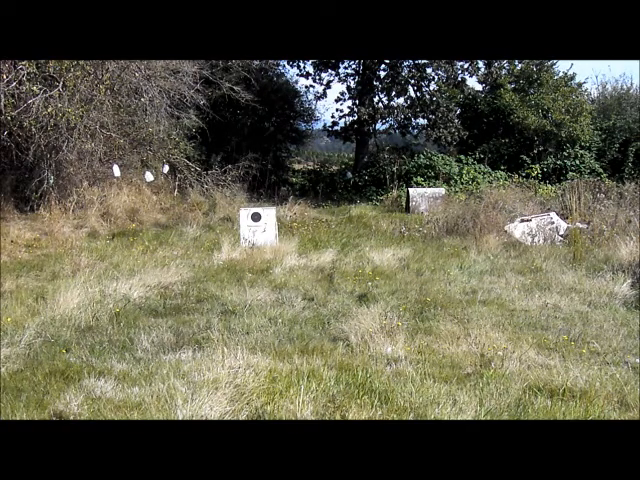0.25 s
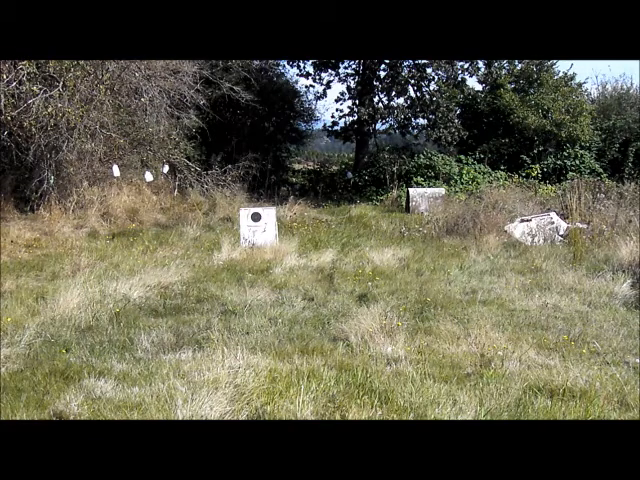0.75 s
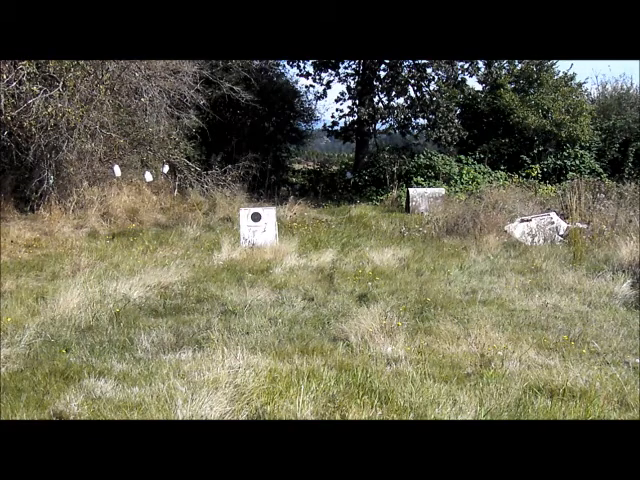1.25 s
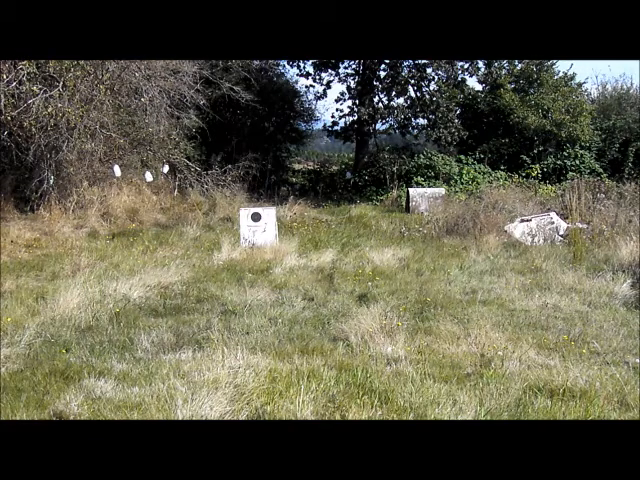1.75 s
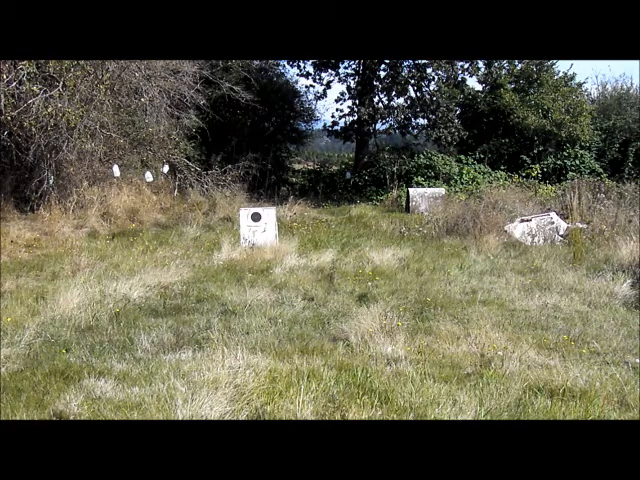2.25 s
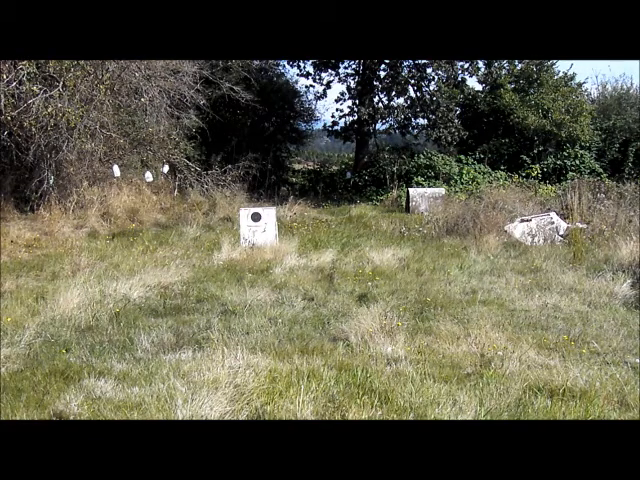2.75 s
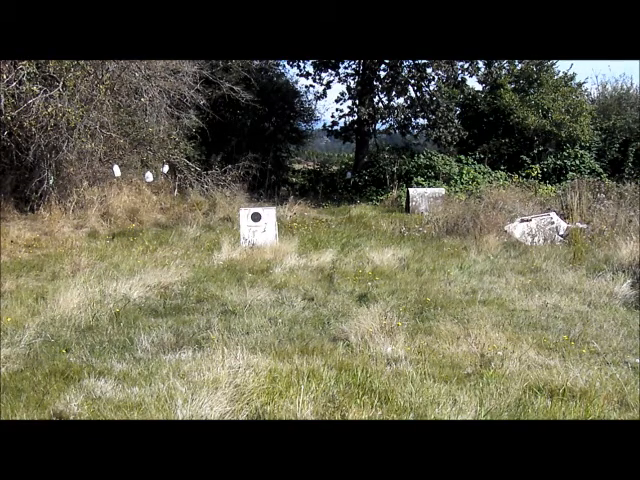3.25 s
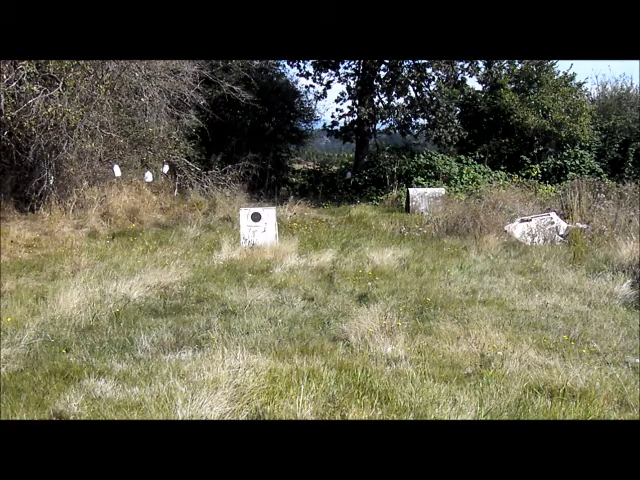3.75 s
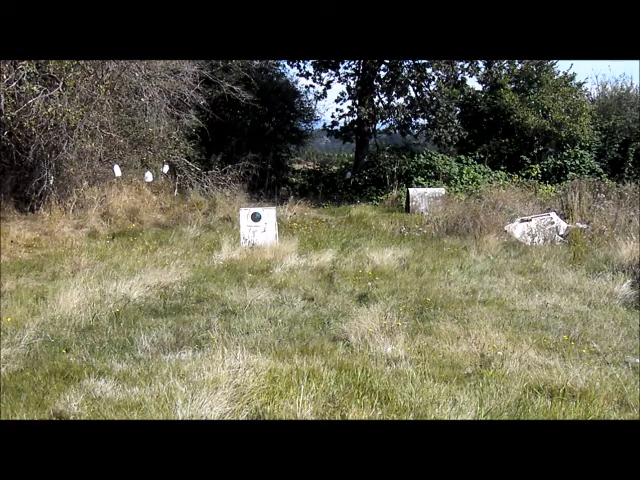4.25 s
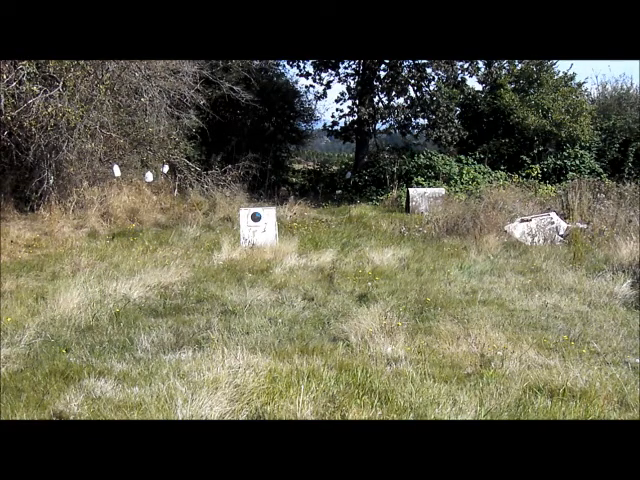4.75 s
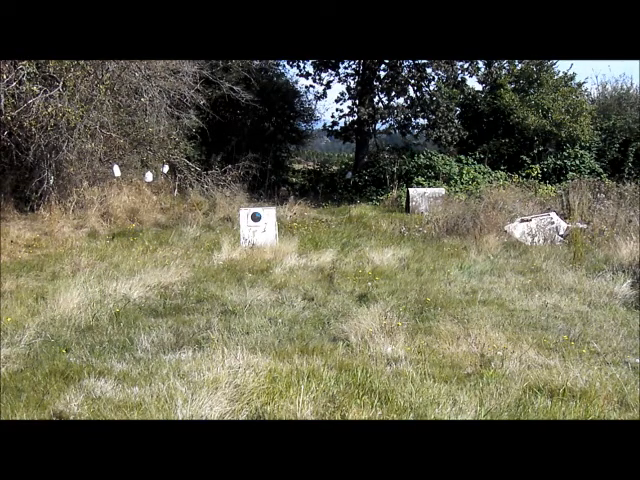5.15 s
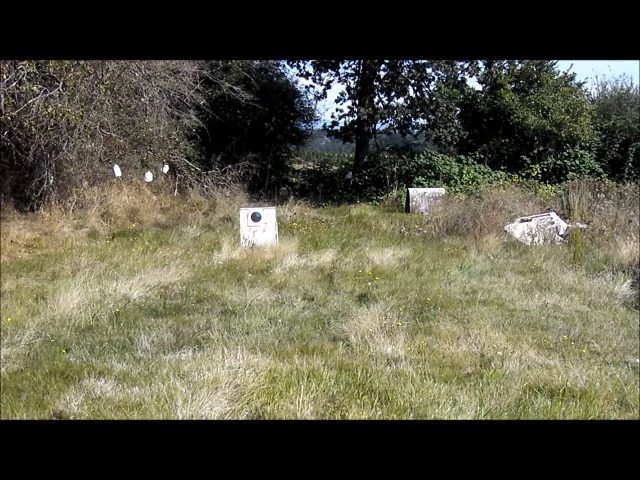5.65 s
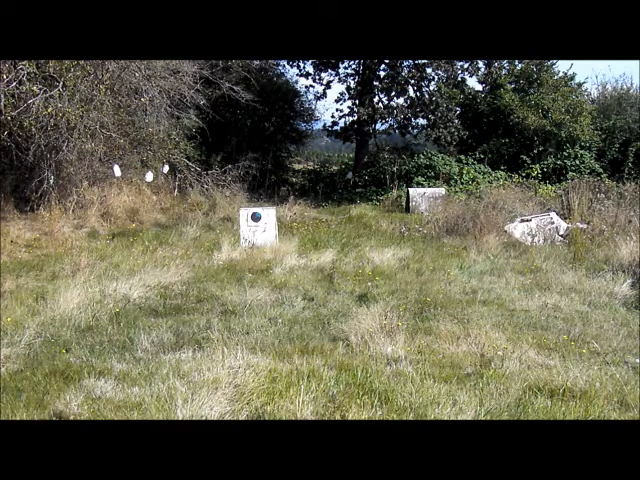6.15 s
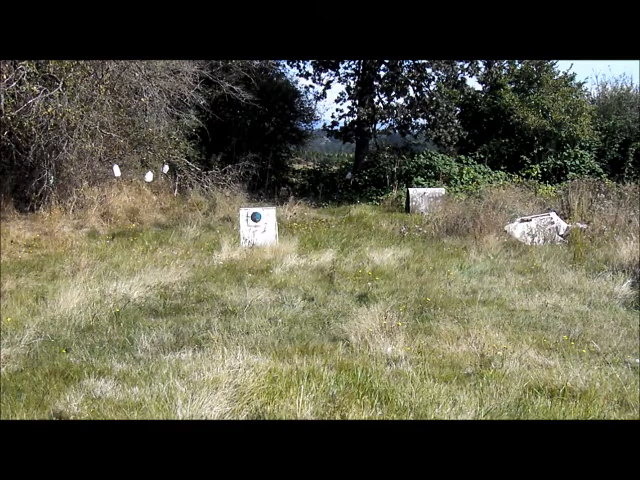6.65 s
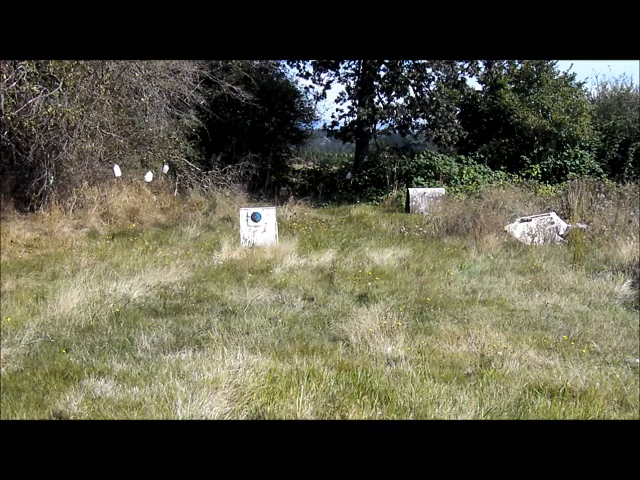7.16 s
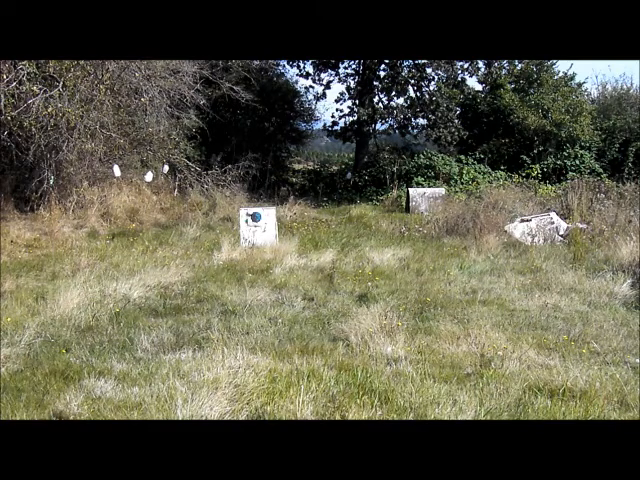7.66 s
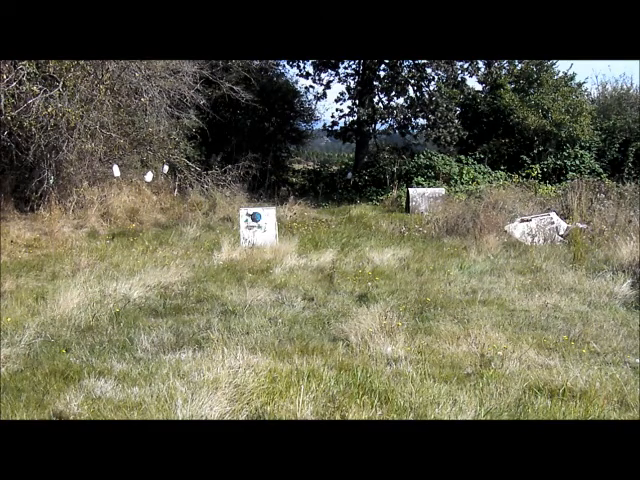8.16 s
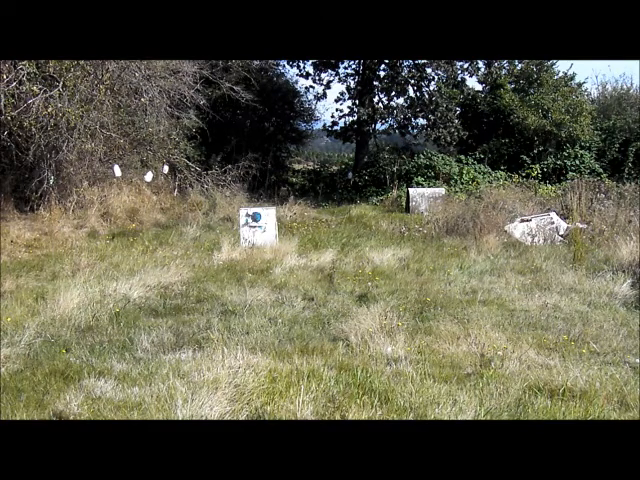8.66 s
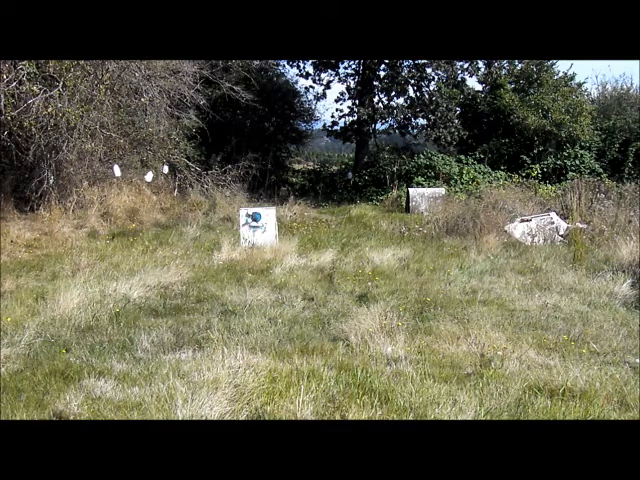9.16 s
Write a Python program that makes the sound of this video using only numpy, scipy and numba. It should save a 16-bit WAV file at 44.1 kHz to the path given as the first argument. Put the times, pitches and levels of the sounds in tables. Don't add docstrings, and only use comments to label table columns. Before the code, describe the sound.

Quiet outdoor hum and faint hiss sit under everything. At 0.3-0.75 s, balls tumble and knock in a hollow feeder close by, hardest near 0.55; one faint knock comes at 1.5. A tiny trigger click leads to a loud gas shot at 2.1 s: tick, bolt strike, sharp barrel pop, hiss and metallic bolt return, then a short feeder-motor whirr. Further singles come at 2.7 and 3.4, a quick group of three at 4.0-4.2, then singles at 4.9, 5.4 and 5.7. Each ball cracks on a distant metal box roughly 0.35 s later, with slaps and leafy scattered echoes. A rapid burst runs 5.9-6.4, its splats trailing to 6.75. A loud click at 7.0 precedes a nearly continuous stream, about thirteen shots per second, until 9.4, with tiny gaps and duller wet splats throughout. The microphone overloads and ducks after bangs.

```python
import sys
import numpy as np
from scipy import signal
from scipy.fft import rfft, irfft, next_fast_len
from scipy.io import wavfile
from scipy.ndimage import uniform_filter1d
from numba import njit

SR = 44100
rng = np.random.default_rng(int(sys.argv[2]) if len(sys.argv) > 2 else 0)


def to_linear_factor(level_db):
    exponent = np.asarray(level_db, float) / 20
    return 10 ** exponent


def unload_audio(sound):
    columns = np.transpose(np.atleast_2d(sound))
    steps = np.round(np.clip(columns, -1, 1) * 32767)
    wavfile.write(sys.argv[1], SR, steps.astype(np.int16))


N = 414981
T = np.arange(N) / SR

# [f/Hz, density/dB]
FIELD_SPECTRUM = [(18, -68), (30, -49.5), (64, -21.5), (134, -25), (165, -5), (259, -6), (499, -1),
                  (3060, -13.5), (3670, -13), (14800, -19.5), (16000, -16)]
FIELD_DB = -48
# [f/Hz, density/dB]
RUMBLE_SPECTRUM = [(20, -8.5), (60, -9), (150, 4), (260, -20), (400, -50)]
RUMBLE_DB = -69.5
# [t/s, level/dB]
AIR_PUFFS = [(2.082, -19.5), (3.3586, -21.5), (4.038, -31), (5.4141, -25), (5.671, -28), (5.904, -31),
             (5.9812, -47), (6.2182, -40), (7.039, -35), (7.117, -25.5), (7.2745, -35), (7.5395, -18.5),
             (7.6176, -40), (8.014, -36), (8.8125, -25.5), (9.2855, -20), (9.3672, -10)]

# [t/s, peak/dB, treble/dB]
BALL_KNOCKS = [(0.302, -31, -11), (.312, -29.5, -17), (0.346, -25, -18), (.402, -19.5, -14),
               (0.459, -18, -18), (0.523, -12, -22), (.544, -13, -11), (.554, -10, -12), (.575, -12, -28),
               (.597, -17, -22), (.653, -22.5, -29), (.668, -29, -28), (.714, -30, -34), (0.753, -37, -34),
               (1.459, -45, -18), (4.386, -23, -10), (5.115, -28, -14)]
# [t/s, level/dB]
TUMBLE_LEVEL = [
    (0.301, -36),
    (.342, -41),
    (.348, -31.5),
    (.4, -29),
    (.46, -22.5),
    (.505, -25.5),
    (.55, -10),
    (.59, -24),
    (.66, -30),
]
# [f/Hz, level/dB, t60/s]
SHELL_MODES = [(388, -11, 0.06), (557, -8, 0.028), (848, -5.5, 0.036), (1110, 2, 0.013), (1440, 4, 0.0071),
               (1950, -1.5, 0.0087), (2380, -10, 0.0041)]
# [f/Hz, density/dB]
WHIRR_SPECTRUM = [(88, -37), (150, 3), (240, -15), (270, -2.5), (406, 2), (612, -0.5), (1020, 0),
                  (1790, -6.5), (2600, -3.5), (3550, -12), (5360, -11), (6260, -16), (7320, -13),
                  (11000, -21), (16000, -25)]
# [f/Hz, width/Hz, level/dB]
MOTOR_CASE = [(2590, 300, -10), (4130, 350, -7), (5400, 700, -5), (7300, 500, -8), (8600, 600, -12),
              (9800, 300, -16), (11000, 500, -14), (12450, 450, -15)]
GEAR_HZ = 2490
FEED_START_MS, FEED_HOLD_MS, FEED_RELEASE_MS, FEED_IDLE_MS = 33, 86, 91, 407
FEED_DB, FEED_SAG_DB, FEED_COAST_DB, FEED_IDLE_DB = -16.5, -17.5, -32, -43
HARD_CONTACT_DB, SETTLE_S, SETTLED_DB = -11, .562, -18

# [t/s, peak/dB, panel pitch
# f/Hz, hardness/dB, echo/dB]
BALL_HITS = [(2.4568, -9.5, 2340, -19, 6), (3.081, -13, 3050, -15, -2.5), (3.7423, -12, 2884, -17.5, 6.5),
             (4.4146, -10.5, 2340, -18.5, 7.5), (4.4661, -1.5, 2280, -8.5, 2.5),
             (5.2533, -10, 2270, -23, 7), (5.7755, -3, 2460, -8, 4), (6.0444, -6.5, 2930, -7, -5),
             (6.2559, -3, 3110, 6, -6), (6.3319, -10, 2310, -16, -14), (6.4266, -8.5, 3130, -18, 0),
             (6.515, 2, 2270, -18, 3.5), (6.577, 4, 3300, -10.5, 7.5), (6.6785, 5.5, 3870, -17, 7.5),
             (6.7397, 9, 3130, -18, 1.5), (7.416, -2.5, 2890, -23, 2.5), (7.4696, 1, 2390, -25, -8),
             (7.5674, -10, 2660, -22, 1.5), (7.6257, -4, 2510, -28, -8), (7.7225, -13, 2970, -19, -7),
               (7.814, -3.5, 2150, -21, -4), (7.897, -5, 2800, -25, -13), (7.981, -13, 2770, -19, 0),
               (8.0517, -6, 2750, -22, -13), (8.1545, -5, 2270, -15, -7), (8.2324, -2.5, 2900, -25, -17),
               (8.303, -2.5, 3380, -15, -11), (8.3884, -6.5, 3330, -16, -7), (8.4431, -4, 2620, -27, -10),
               (8.5481, -8.5, 2800, -20, -1), (8.608, 0, 2550, -31, -1.5), (8.6788, -6, 1700, -21, -10),
               (8.7643, 2, 2852, -26, -6), (8.86, -3.5, 3170, -25, -5), (8.9206, -1.5, 2200, -22, -3.5),
               (8.994, -1, 2150, -19, -4.5), (9.0798, -7, 2500, -22, -3), (9.1661, -6, 2260, -12, -11),
               (9.2466, -10.5, 2760, -18, 0), (9.3236, -10.5, 2346, -16, -8),
               (9.4085, -10, 2500, -16, -2.5)]
# [delay/ms, level/dB]
HARD_ECHOES = [
    (8.5, -23),
    (25.5, -22),
    (33, -24),
    (46, -10),
    (61, -24),
    (67, -23),
    (88, -30),
]
# [f/Hz, density/dB]
SPRAY_SPECTRUM = [(180, -20), (300, -15), (762, -11), (978, -8), (1720, -2), (2440, 3), (2790, 2.5),
                  (7950, -9), (11500, -17), (16000, -27)]
UPPER_HZ, UPPER_HZ_PER_DB, UPPER_SPREAD = 5000, 54, 0.029
PANEL_T60_S, WET_FROM_S, WET_T60_S = .01, 7.5, .005
GRASS_MS, GRASS_DB, GRASS_FADE_DB_PER_MS = 3.95, -11, .95
HEDGE_MS, HEDGE_DB = 22.4, -16
SHED_MS, SHED_DB = 51.4, -11.5
TREES_MS, TREES_DB, TREES_FADE_DB_PER_MS = 87, -26, .115

# [first blast t/s, last blast t/s, first force/dB, second force/dB, last force/dB]
TRIGGER_PULLS = [(2.0826, 2.0826, -5.5, 0, 0), (2.7378, 2.7379, -4.5, 0, 0), (3.361, 3.361, -5, 0, 0),
                 (4.0393, 4.1965, -3, -6.5, -4.5), (4.8959, 4.8957, -4.5, 9, 0),
                 (5.4133, 5.4133, -6.5, 0, 0), (5.6725, 5.6728, -4, 0, 2), (5.9021, 6.3768, -2, -3, -7),
                 (7.0387, 7.354, -1, -4.5, -4.5), (7.4598, 8.4879, -4.5, -6.5, -6.5),
                 (8.5751, 9.3654, -3, -3.5, -7.5)]
CYCLE_S = .079
FORCE_SCATTER_DB = 1
# [strike lead/ms, return lag/ms]
BOLT_STROKES = [
    (14.6, 22.9),
    (15.6, 21.7),
    (19.3, 33.6),
]
# [t/s, peak/dB]
LOUD_VALVE_TICKS = [
    (2.047, -24),
    (2.0498, -35),
    (7.0046, -16),
]
# [f/Hz, level/dB, t60/s]
BARREL_MODES = [(324.7, -10, 0.043), (558, -19.5, 0.043), (936, -15.5, 0.013), (1960, -18.5, 0.004),
                (2660, -21, 0.0016)]
# [f/Hz, level/dB, t60/s]
BOLT_MODES = [(391, -3.5, 0.029), (810, 4, 0.018), (1184, -7, 0.019), (3440, -1, 0.0083), (2130, -11, .004),
              (7530, -2.5, 0.0022)]
# [f/Hz, density/dB]
JET_SPECTRUM = [(530, -8), (900, 1.5), (2830, -12.5), (3470, -13), (5410, -9.5), (8350, -16), (9090, -18.5),
                (11800, -20), (16000, -22)]
# [t/ms, level/dB]
GAS_LEVEL = [
    (-19, -45),
    (-13.5, -18),
    (-2.5, -13.5),
    (-1.44, 1.5),
    (1.7, -0.5),
    (3, 7.5),
    (9, -8),
    (46, -33),
    (60, -67.5),
]


def spikes(s, size):
    x = np.zeros(N + 1)
    np.add.at(x, np.clip((np.asarray(s) * SR).astype(int), 0, N), size)
    return x[:N]


def rattle(s, size, tau):
    decay = np.exp(-T[:800] / tau)
    return signal.oaconvolve(spikes(s, size), decay)[:N] * rng.standard_normal(N)


def ring(x, modes):
    out = 0
    for hz, db, t60 in modes:
        pole = np.exp(2j * np.pi * hz / SR - np.log(1000) / (t60 * SR))
        out = out + to_linear_factor(db) * signal.lfilter([1], [1, -pole], x).imag
    return out


def resonance(x, hz, q):
    return signal.lfilter(*signal.iirpeak(hz, q, fs=SR), x)


def coloured(points):
    hz, db = np.transpose(points)
    size = next_fast_len(N)
    bins_hz = np.arange(size // 2 + 1) * SR / size
    shape = to_linear_factor(np.interp(np.log(bins_hz + 1), np.log(hz), db))
    x = irfft(rfft(rng.standard_normal(size)) * shape, size)[:N]
    return x / x.std()


def contour(s, size, shape):
    ms, db = np.transpose(shape)
    return np.max([g * to_linear_factor(np.interp(T, t + ms / 1000, db, -200, -200)) for t, g in zip(s, size)], axis=0)


def flicker(rate, spread_db):
    k = int(SR / rate)
    steps = np.repeat(rng.standard_normal(N // k + 1), k)[:N]
    return to_linear_factor(spread_db * uniform_filter1d(steps, k))


def field():
    switch_on = 1 + 0.81 * np.exp(-T / 0.0057)
    return to_linear_factor(FIELD_DB) * flicker(3.2, 1.0) * switch_on * coloured(FIELD_SPECTRUM)


def puffs():
    s, db = np.transpose(AIR_PUFFS)
    push = np.hanning(int(0.0023 * SR))
    return signal.oaconvolve(spikes(s - .001, to_linear_factor(db + 25.5)), push)[:N]


def feeder_motor(s):
    ends_ms = np.cumsum([FEED_START_MS, FEED_HOLD_MS, FEED_RELEASE_MS, FEED_IDLE_MS])
    levels_db = [FEED_DB, FEED_SAG_DB, FEED_COAST_DB, FEED_IDLE_DB]
    run = contour(s, np.ones(len(s)), np.transpose([ends_ms, levels_db]))
    turn = 2 * np.pi * GEAR_HZ * (T + np.cumsum(np.log(flicker(25, 0.0238))) / SR)
    whine = to_linear_factor(-25) * np.sin(turn) + to_linear_factor(-28) * np.sin(2 * turn)
    brushes = rng.standard_normal(N)
    case = sum(to_linear_factor(db) * resonance(brushes, hz, hz / max(width, 220)) for hz, width, db in MOTOR_CASE)
    return run * (flicker(120, 2.15) * (0.64 * coloured(WHIRR_SPECTRUM) + case) + whine)


def feeder_balls():
    when, shake_db = np.transpose(TUMBLE_LEVEL)
    tumble_gain = to_linear_factor(np.interp(T, when, shake_db, -200, -200) - 9.5)
    tumble = (rng.random(N) < 2800 / SR) * tumble_gain * flicker(90.4, 1.4)
    knock, peak_db, edge_db = np.transpose(BALL_KNOCKS)
    contacts = tumble + rattle(knock, to_linear_factor(peak_db - 18.5), 0.0038)
    treble = to_linear_factor(np.where(T < SETTLE_S, HARD_CONTACT_DB, SETTLED_DB) + 15.5)
    edges = tumble * treble + rattle(knock, to_linear_factor(peak_db + edge_db), 0.00043)
    body = sum(ring(contacts * rng.laplace(size=N), [mode]) for mode in SHELL_MODES)
    clicks = ring(edges * rng.laplace(size=N), [(3600, 1.5, 0.00107), (6020, -27, 0.00055)])
    return body + clicks


def scatter():
    gap_ms, end_ms = HEDGE_MS - 3, 600
    grass_end_db = GRASS_DB - GRASS_FADE_DB_PER_MS * (gap_ms - GRASS_MS)
    grass = [(GRASS_MS - 2, -100), (GRASS_MS, GRASS_DB), (gap_ms, grass_end_db)]
    yard = [(HEDGE_MS, HEDGE_DB), (SHED_MS - 3, HEDGE_DB), (SHED_MS, SHED_DB)]
    trees_end_db = TREES_DB - TREES_FADE_DB_PER_MS * (end_ms - TREES_MS)
    return grass + yard + [(TREES_MS, TREES_DB), (end_ms, trees_end_db)]


def burst_on_panel(s, low_hz, crack_db, noise):
    t = np.arange(1000) / SR
    high_hz = (UPPER_HZ + UPPER_HZ_PER_DB * crack_db) * (1 + UPPER_SPREAD * noise[-1])
    burst = -1. * (t == 0) + 0.14 * noise * np.exp(-t / 0.0022)
    low_t60 = PANEL_T60_S if s < WET_FROM_S else WET_T60_S
    panel = ring(burst, [(low_hz, 0, low_t60), (high_hz, crack_db + 24, .0022),
                         (0.74 * low_hz, -12, .008), (1.2963 * low_hz, -3, .005)])
    crack = ring(burst, [(5450, 2.1, 0.0019), (9100, -4, 0.0015), (11570, -3, 0.0022)])
    hit = signal.lfilter(*signal.butter(3, 1200, "high", fs=SR), panel + to_linear_factor(crack_db + 19) * crack)
    return hit / np.abs(hit).max()


def splats():
    direct, fieldward = np.zeros((2, N + 1000))
    hits = np.array(BALL_HITS)
    for (s, peak_db, low_hz, crack_db, echo_db), noise in zip(hits, rng.standard_normal((len(hits), 1000))):
        hit = to_linear_factor(peak_db + 23) * burst_on_panel(s, low_hz, crack_db, noise)
        start = int(s * SR)
        direct[start:start + 1000] += hit
        fieldward[start:start + 1000] += to_linear_factor(echo_db) * hit
    direct, fieldward = direct[:N], fieldward[:N]
    delay_ms, slap_db = np.transpose(HARD_ECHOES)
    slaps = spikes(delay_ms / 1000, to_linear_factor(slap_db))[:4200]
    slaps = signal.lfilter(*signal.butter(2, 3000, fs=SR), slaps)
    slaps = signal.oaconvolve(fieldward, slaps)[:N]
    leaves = contour([0], [1], scatter()) * flicker(350, 1.6) * coloured(SPRAY_SPECTRUM)
    leaves = leaves[:int(.6 * SR)]
    dull = signal.lfilter(*signal.butter(2, 5500, fs=SR), leaves)
    leaves = dull + np.exp(-T[:len(dull)] / 0.22) * (leaves - dull)
    s, peak_db, echo_db = hits.T[[0, 1, 4]]
    into_leaves = spikes(s, to_linear_factor(peak_db + echo_db + 5)) + 0.008 * fieldward
    return direct + slaps + signal.oaconvolve(into_leaves, leaves)[:N]


def shots():
    rows = []
    for first, last, first_db, second_db, last_db in TRIGGER_PULLS:
        more = round((last - first) / CYCLE_S)
        forces_db = np.r_[first_db, np.linspace(second_db, last_db, more)]
        rows += zip(np.linspace(first, last, more + 1), forces_db)
    s, force_db = np.transpose(rows)
    return s, force_db + FORCE_SCATTER_DB * rng.standard_normal(len(s))


def marker(s, force_db):
    stroke = np.r_[2, np.diff(s) > .2].astype(int)
    lead, lag = np.array(BOLT_STROKES)[stroke].T / 1000
    size = to_linear_factor(force_db + 13)
    seat_vary, suck_vary, back_vary, port_vary = to_linear_factor(1.2 * rng.standard_normal((len(s), 4))).T

    muzzle = 1.1 * spikes(s - .0013, size) - 1.9 * spikes(s - .0005, size)
    muzzle += .6 * spikes(s + 0.00313, size * suck_vary)
    blast = ring(uniform_filter1d(muzzle, size=5) * 5, BARREL_MODES)

    strike = spikes(s - lead - .0008, size) - 1.3 * spikes(s - lead - .0003, size)
    seat = spikes(s - .0068, size * seat_vary) + 0.4 * rattle(s - .0068, size * seat_vary, 0.00063)
    back = spikes(s + lag - .0015, size) + 0.22 * rattle(s + lag - .002, size * back_vary, 0.0023)
    bolt = ring(to_linear_factor(-15.5) * strike + to_linear_factor(-23) * seat, BOLT_MODES[:3]) + to_linear_factor(-4.5) * ring(back, BOLT_MODES)

    click_s, click_db = np.transpose(LOUD_VALVE_TICKS)
    valve = rattle(s - lead - .0042, to_linear_factor(-25.5) * size, 0.0018) + rattle(click_s, to_linear_factor(click_db - 2), 0.0039)
    tick = ring(valve, [(1620, -7.5, 0.00091), (4930, -11, 0.0018), (13260, -19, 0.00114)])

    gas = to_linear_factor(-3) * contour(s, size, GAS_LEVEL) * flicker(700, 2.5) * coloured(JET_SPECTRUM)
    leave = spikes(s + .0022, to_linear_factor(0.5) * size * port_vary)
    ports = ring(leave, [(5800, 1.5, 0.0061), (8500, -23, .003)])
    near = blast + bolt + tick + gas + ports
    return near - 0.76 * resonance(near, 770, 3.5)


def scene():
    bass_cut = signal.butter(6, 220, "high", fs=SR, output="sos")
    s, force_db = shots()
    sources = feeder_motor(s) + feeder_balls() + splats() + marker(s, force_db)
    return (field() + puffs() + signal.sosfilt(bass_cut, sources))[None]


@njit
def duck(x, top, attack, release, slow, share):
    gain, quick, memory = np.empty(len(x)), 0., 0.
    for i in range(len(x)):
        quick += (abs(x[i]) - quick) * (attack if abs(x[i]) > quick else release)
        memory = max(share * quick, memory * (1 - slow))
        gain[i] = 1 / np.sqrt(1 + ((quick + memory) / top) ** 2)
    return gain


def low_pass(x):
    return signal.sosfilt(signal.butter(12, 17030, fs=SR, output="sos"), x)


def record(dry):
    attack, release, slow = 1 / (0.00084 * SR), 1 / (0.033 * SR), 1 / (.2 * SR)
    gain = duck(dry[0], 0.3, attack, release, slow, 0.1)
    late = int(0.0014 * SR)
    x = dry[0] * np.r_[np.ones(late), gain][:N] + to_linear_factor(RUMBLE_DB) * coloured(RUMBLE_SPECTRUM)
    x = signal.lfilter(*signal.iirnotch(7880, 35, fs=SR), x)
    x = signal.sosfilt(signal.ellip(10, .2, 60, 15700, fs=SR, output="sos"), x)
    x = np.clip(x, -1, 1)
    x = signal.sosfilt(signal.ellip(8, .2, 40, 16900, fs=SR, output="sos"), x)
    return low_pass(np.clip(x, -1, 1)[None])


dry = scene()
out = record(dry)
unload_audio(out)
```